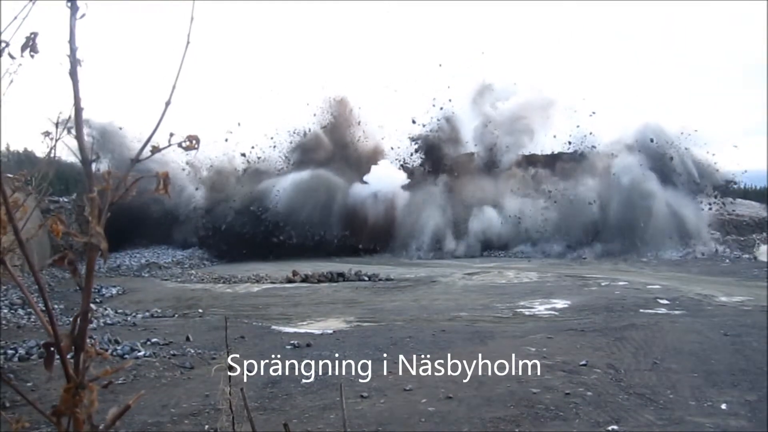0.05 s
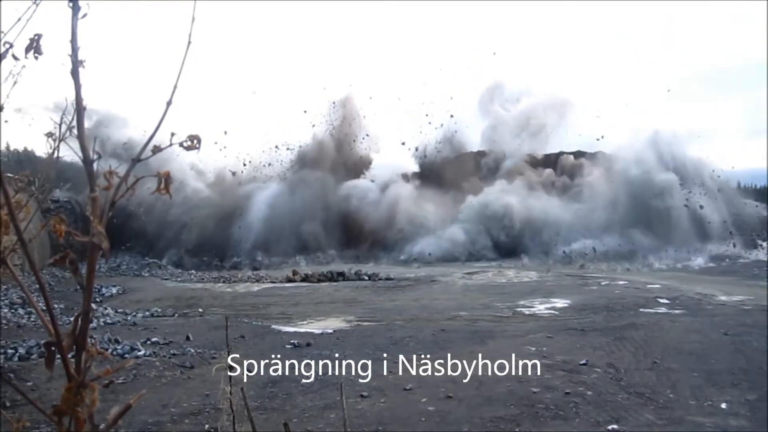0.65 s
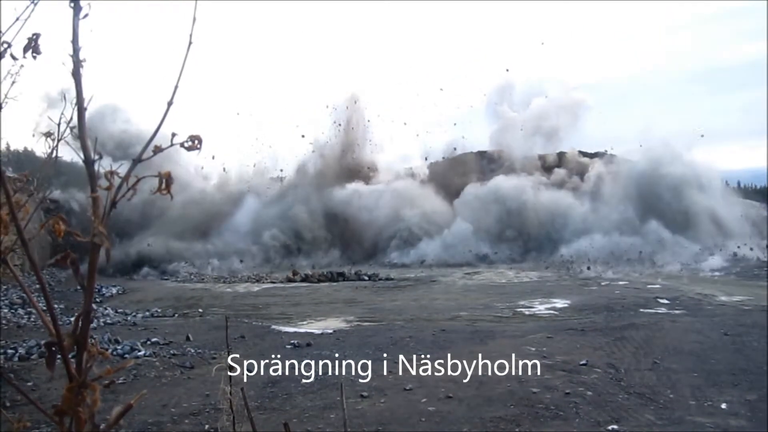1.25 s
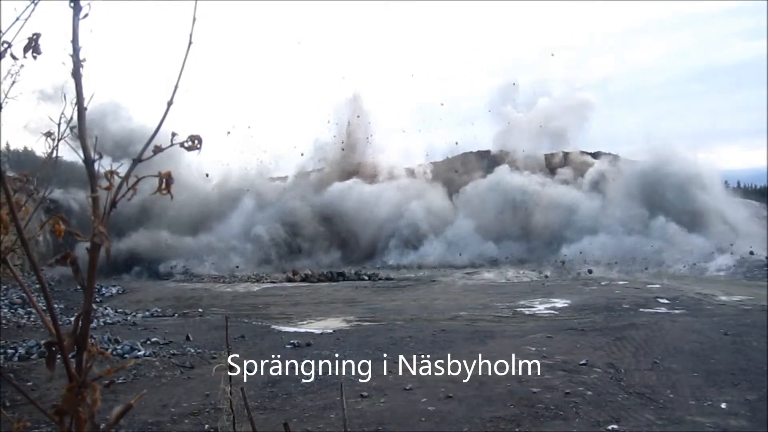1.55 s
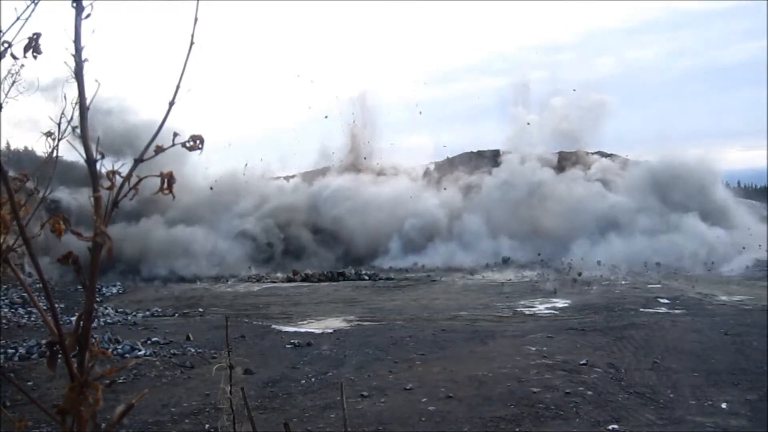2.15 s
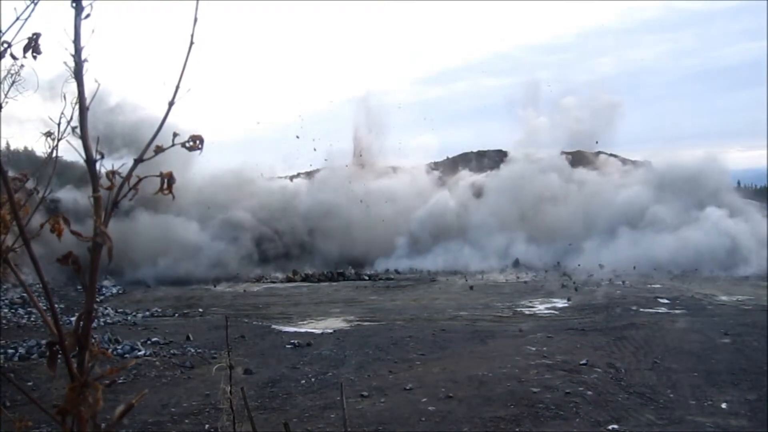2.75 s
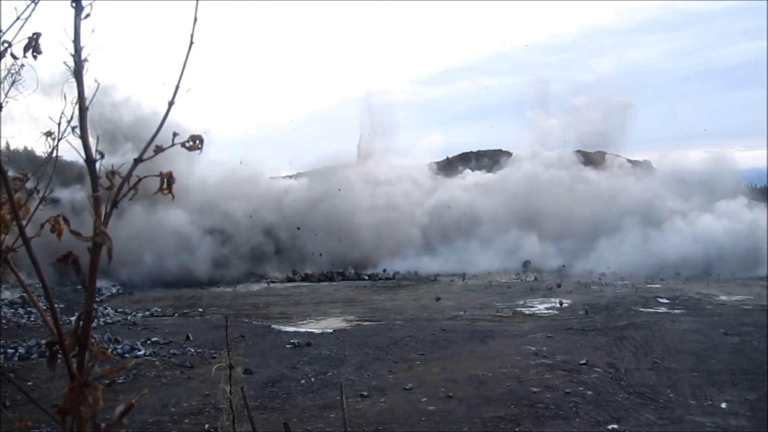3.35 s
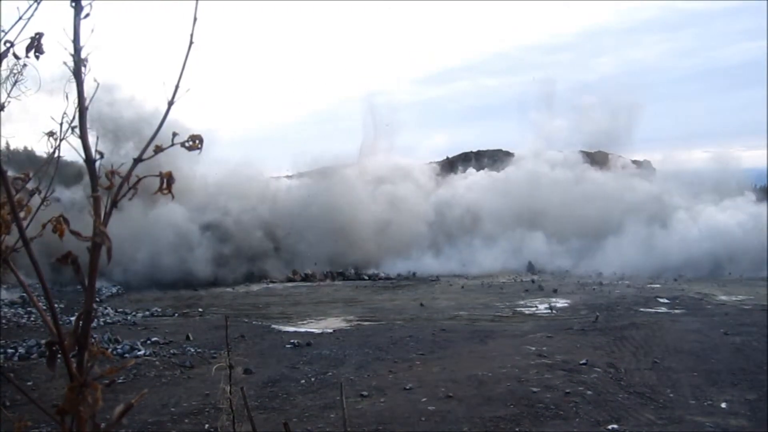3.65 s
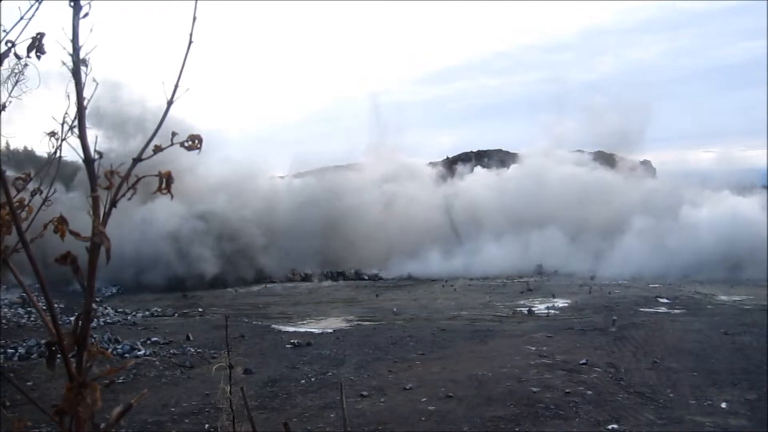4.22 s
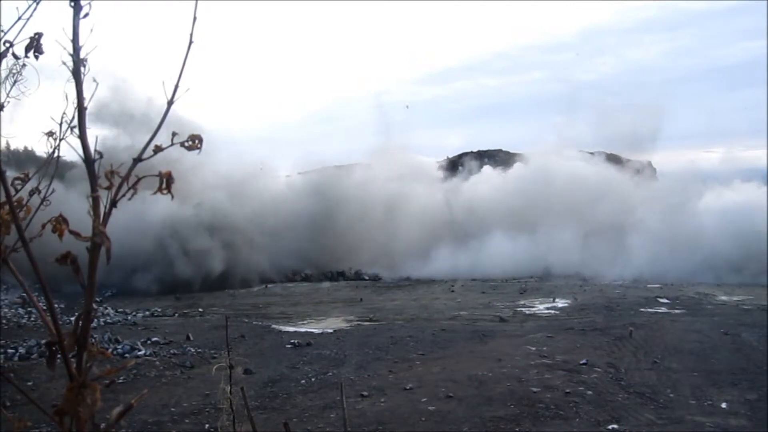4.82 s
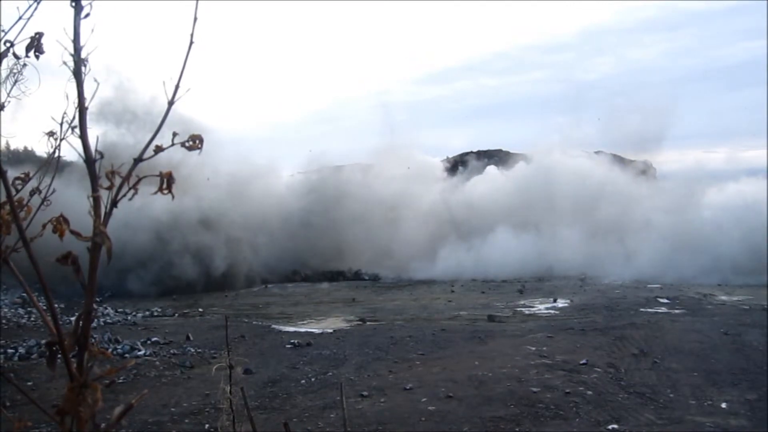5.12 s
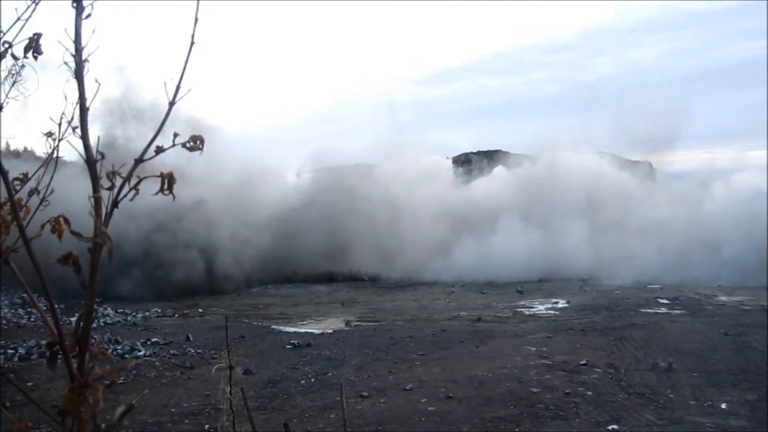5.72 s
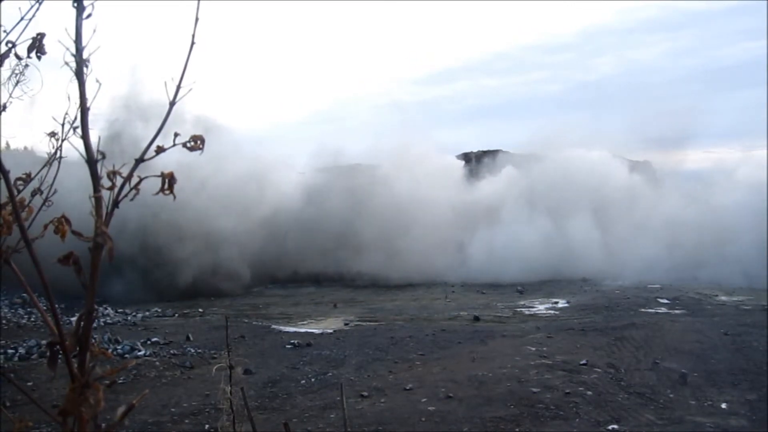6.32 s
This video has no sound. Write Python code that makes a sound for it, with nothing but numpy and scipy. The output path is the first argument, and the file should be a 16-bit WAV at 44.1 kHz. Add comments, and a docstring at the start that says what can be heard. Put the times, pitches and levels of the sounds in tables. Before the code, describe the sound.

Broken rock pours down in a distant roar over a low throb, then thins into clatter and single knocks of falling stones.

```python
"""Rock fall after a quarry blast

Some way off, the broken rock face pours down. Countless boulders, stones and bits of gravel strike
each other in a roar that swells, then thins out into a clatter and single knocks. A low throb comes
and goes underneath. A small camera's microphone picks it up, adding hollow tones and a faint hiss."""
import sys
import numpy as np
from scipy import signal
from scipy.fft import rfft, irfft, next_fast_len
from scipy.io import wavfile
from scipy.ndimage import map_coordinates

SR = 44100
rng = np.random.default_rng(int(sys.argv[2]) if len(sys.argv) > 2 else 0)


def wav_record(signal):
    """Record a signal, one row per channel, as 16-bit PCM in the file named by sys.argv[1]."""
    frames = np.transpose(np.atleast_2d(signal))
    bounded = np.clip(frames, -1, 1)
    # unit amplitude maps onto the largest positive 16-bit level
    quanta = np.round(bounded * 32767).astype(np.int16)
    wavfile.write(sys.argv[1], SR, quanta)


N = 285327
TIME = np.arange(N) / SR
SIZE = next_fast_len(N + SR // 2, True)
FREQ = np.fft.rfftfreq(SIZE, 1 / SR)

# How the falling stones grow loud and fade:
# peak_db, swell_db, swell_end_s, hold_end_s, slump_db, thinning_db_per_s
STONE_LOUDNESS = (-18.5, 3.5, 0.55, 0.88, 2.5, 5.5)


def amp(db):
    """Turn decibels into a number to multiply a sound by."""
    return 10 ** (np.asarray(db) / 20)


def unit(x):
    """Scale a sound so that its average power is 1."""
    return x / np.sqrt(np.mean(x ** 2) + 1e-20)


def tone_curve(points):
    """Join (pitch_hz, level_db) points into a level for every frequency."""
    hz, db = np.transpose(points)
    return np.interp(np.log(FREQ + 1), np.log(hz + 1), db)


def wobble(rate):
    """A smooth random curve through `rate` new values a second."""
    return map_coordinates(rng.standard_normal(int(N * rate / SR) + 4), [TIME * rate])


def coloured(x, db):
    """Turn each frequency up or down by db, so that ringing comes after a hit, never before."""
    cepstrum = irfft(np.log(amp(db)), SIZE)
    cepstrum[1:SIZE // 2] *= 2
    cepstrum[SIZE // 2 + 1:] = 0
    return irfft(rfft(x, SIZE) * np.exp(rfft(cepstrum)), SIZE)[:N]


def housing():
    """The microphone's hollow case rings at certain pitches: the boost in dB at each frequency."""
    # Where the case rings: pitch_hz, half_width_hz, boost_db
    resonances = [(460, 56, 5.5), (626.3, 33, 9), (735, 37, 7.5), (923, 120, 12), (1425, 76, 9),
                  (1598, 62, 5), (1920, 180, 8.5), (2619.6, 104, 15), (2800, 76, 5), (3689, 76, 9.5),
                  (4086, 135, 10), (4737, 107, 11), (5250, 114, 9.5), (6670, 140, 7)]
    return sum(db * np.exp(-((FREQ - hz) / width) ** 2 / 2) for hz, width, db in resonances)


def fall_level(peak_db, swell_db, swell_end_s, hold_end_s, slump_db, thinning_db_per_s, slump_s=0.31):
    """One size of rock swells, holds, slumps as the main mass lands, then thins out: its level in dB."""
    swell_left = np.clip(1 - TIME / swell_end_s, 0, 1)
    fading_s = np.maximum(TIME - hold_end_s, 0)
    landed = 1 - np.exp(-fading_s / slump_s)
    return peak_db - swell_db * swell_left - slump_db * landed - thinning_db_per_s * fading_s


def air():
    """The open air makes a faint low wash over the quarry floor."""
    # The tone of the air: pitch_hz, level_db
    air_tone = [(15, 0.5), (27, 4), (55, -8.5), (100, -1), (250, -4.5), (500, -21), (1500, -36)]
    return amp(-58.5) * unit(coloured(rng.standard_normal(N), tone_curve(air_tone)))


def throb_strength(rise_s=0.073, fall_s=0.057, tremor_db=-48.5, fade_db_per_s=2.5):
    """Each surge of the throb rises, holds and dies away, on top of a weak, slowly fading tremor."""
    # Surges of the throb: start_s, length_s, level_db
    surges = [(0.037, 1.14, -37), (1.517, .96, -46.5), (1.84, .28, -39), (3.08, 0.28, -56),
              (3.757, 0.52, -49.5)]
    power = amp(tremor_db - fade_db_per_s * TIME) ** 2
    for start, length, db in surges:
        rise = np.clip((TIME - start) / rise_s, 0, 1)
        fall = np.exp(-np.maximum(TIME - start - length, 0) / fall_s)
        power += (amp(db) * rise * fall) ** 2
    return np.sqrt(power)


def throb(rate_hz=17.55):
    """A low shudder: soft thumps that push and pull in turn, over a slow sway."""
    cycles = np.cumsum(rate_hz * (1 + 0.0075 * wobble(4))) / SR
    phase = 2 * np.pi * cycles + 0.13 * wobble(40)
    swing = np.sign(np.sin(phase))
    kicks = np.diff(swing, prepend=swing[0]) * amp(1.5 * wobble(35))  # two kicks in each cycle
    t = TIME[:SR // 4]

    def ring(hz, fade_s):
        """Each kick starts a tone that drops 60 dB in fade_s."""
        tone = np.sin(2 * np.pi * hz * t) * amp(-60 * t / fade_s)
        return unit(signal.fftconvolve(kicks, tone)[:N])

    thump = ring(hz=50, fade_s=0.038)
    rattle = amp(-2) * ring(hz=115, fade_s=0.031)
    sway = amp(-7) * np.sin(phase) + amp(-2) * np.sin(2 * phase)
    return throb_strength() * unit(thump + rattle + sway)


def knock(pitch_hz, width_octaves, contact_s, housing_db, grit_db=-20, grit_fade_s=0.19):
    """A rock crunches for an instant and scatters grit; a narrow width gives the clink of a hard chip."""
    t = np.arange(SR // 5) / SR
    hz = np.fft.rfftfreq(len(t), 1 / SR) + 1
    band = np.exp(-(np.log2(hz / pitch_hz) / width_octaves) ** 2 / 2)
    band *= amp(np.interp(hz, FREQ, housing_db))
    crunch = irfft(rfft(rng.standard_normal(len(t))) * band, len(t))
    progress = t / contact_s
    blow = progress * np.exp(1 - progress)  # strongest at contact_s
    grit = amp(grit_db - 60 * t / grit_fade_s) * (1 - np.exp(-progress))
    shape = blow + grit
    return unit(crunch * shape) * np.sqrt(np.mean(shape ** 2))


def clatter(count, offset_db, stand_out_db, pitch_hz, range_octaves, spread_db=2.5):
    """Stray stones bounce all through the slide, standing out more and more as it thins."""
    out = np.zeros(N + SR)
    housing_db, stones_db = housing(), fall_level(*STONE_LOUDNESS)
    for when, force, smallness in rng.random((count, 3)):
        start = int(when * N)
        db = stones_db[start] + offset_db + stand_out_db * when + spread_db * (2 * force - 1)
        db -= 4 * smallness  # smaller stones are weaker, and higher too
        hz = pitch_hz * 2 ** (range_octaves * (2 * smallness - 1))
        hit = amp(db) * knock(hz, width_octaves=0.4, contact_s=0.0011, housing_db=housing_db)
        out[start:][:len(hit)] += hit
    return out[:N]


def near_rocks():
    """Single rocks land nearer by as the roar dies down, each with a short rattle of grit."""
    # Rocks landing: start_s, level_db, pitch_hz, width_octaves, contact_s
    landings = [(2.475, -27.5, 2400, 0.42, 0.0027), (3.389, -31.5, 2200, 0.41, 0.0017),
                (3.482, -28, 1290, .6, .0018), (3.71, -33.5, 3180, .4, 0.002),
                (3.764, -35.5, 4800, 0.095, 0.0015), (4.05, -34.5, 2800, .42, .003),
                (4.144, -30.5, 1290, 1.1, 0.0048), (4.162, -42.5, 5100, 0.12, 0.0026),
                (4.243, -44, 4970, 0.45, 0.0023), (4.435, -29, 2030, 0.24, 0.0029),
                (4.564, -35.5, 1490, .45, 0.0028), (4.64, -33.5, 1510, 0.67, 0.0042),
                (4.851, -42, 2600, 0.81, 0.002), (4.859, -37, 3870, 0.62, 0.0016),
                (5.016, -35, 1160, 0.25, 0.0016), (5.219, -38, 480, .55, .004),
                (5.52, -35.5, 785, 0.27, .0015), (5.647, -40, 700, 1.3, 0.0033),
                (5.753, -47, 4170, .3, 0.0018), (5.846, -30, 250, 1.47, 0.00093),
                (5.892, -37.5, 2600, .55, .0013), (5.9386, -28, 1270, 0.92, 0.0025),
                (6.022, -34.5, 1300, .9, .0014), (6.042, -32.5, 1670, 0.72, .0028),
                (6.062, -32.5, 1490, 0.83, 0.0015), (6.158, -41, 2650, .16, .0026)]
    out, housing_db = np.zeros(N + SR), housing()
    for start_s, level_db, pitch_hz, width_octaves, contact_s in landings:
        hit = amp(level_db) * knock(pitch_hz, width_octaves, contact_s, housing_db, grit_db=-12)
        out[round(start_s * SR):][:len(hit)] += hit
    return out[:N]


def impacts(per_s, spread_db):
    """Rocks touch at random moments, each making one click of random strength."""
    hits = rng.random(N) < per_s / SR
    strength = amp(spread_db * np.clip(rng.standard_normal(N), -2, 2))
    return unit(hits * strength * rng.standard_normal(N) / np.sqrt(per_s))


def pour(tone, per_s, spread_db, far_db):
    """One size of rock pours down: separate hits over the blur of countless farther ones."""
    contacts = impacts(per_s, spread_db) + amp(far_db) * rng.standard_normal(N)
    return unit(coloured(contacts, tone_curve(tone) + housing()))


def rock_fall(slip_at_s=6.13, slip_width_s=0.22, slip_peak_db=2.5):
    """The main roar: the more rock is moving, the louder and closer together the hits are."""
    # The tone of the hits for each size of rock: pitch_hz, level_db
    boulder_tone = [(20, -42), (70, -9), (150, -3.5), (260, -2.5), (480, 2), (900, -2.5), (1200, -4.5),
                    (1800, -19), (4000, -69.5)]
    stone_tone = [(300, -31.5), (800, -18.5), (1300, 1.5), (1950, 1), (2400, -2), (3100, 0), (3400, -12.5),
                  (4500, -23), (8000, -51)]
    gravel_tone = [(1500, -32), (3000, -6), (3700, 2.5), (4500, -3), (5100, -5), (6200, -11.5),
                   (7200, -17.5), (8600, -22.5), (9800, -36.5), (15000, -49)]
    # How boulders and gravel grow loud and fade:
    # peak_db, swell_db, swell_end_s, hold_end_s, slump_db, thinning_db_per_s
    boulder_loudness = (-20, 1.5, 0.33, 0.69, 3.5, 5)
    gravel_loudness = (-32, 4.5, 0.5, 1.3, 2.1, 5.5)
    boulders_db = fall_level(*boulder_loudness)
    stones_db = fall_level(*STONE_LOUDNESS)
    gravel_db = fall_level(*gravel_loudness)
    flow = amp(0.7 * (stones_db - stones_db.max()))  # 1 when the most rock is moving
    # Hits come in clumps: one tumbling block throws big and small pieces together.
    clumps_db = 0.46 * wobble(18) + 0.15 * wobble(130)
    # A last patch of the heap gives way.
    slip_db = slip_peak_db * np.exp(-((TIME - slip_at_s) / slip_width_s) ** 2 / 2)
    boulders = amp(boulders_db) * pour(boulder_tone, per_s=1800 * flow, spread_db=2.5, far_db=2.5)
    stones = amp(stones_db) * pour(stone_tone, per_s=4000 * flow, spread_db=1.5, far_db=2.5)
    gravel = amp(gravel_db) * pour(gravel_tone, per_s=4000 * flow, spread_db=4.5, far_db=3)
    return amp(clumps_db + slip_db) * (boulders + stones + gravel)


def scene():
    """Everything heard at the edge of the quarry floor, in one channel."""
    stones = clatter(count=150, offset_db=-7, stand_out_db=6, pitch_hz=1610, range_octaves=1.23)
    pebbles = clatter(count=40, offset_db=-15.5, stand_out_db=11, pitch_hz=4400, range_octaves=0.25)
    return (rock_fall() + stones + pebbles + near_rocks() + throb() + air())[None]


def record(dry):
    """The camera adds a faint hiss and cuts off the very highest pitches."""
    # The tone of the hiss: pitch_hz, level_db
    hiss_tone = [(20, 1), (300, 6.5), (3000, -0.5), (8000, 0.5), (11000, -3.5), (11400, -1.5), (11700, -3),
                 (12000, -3), (13500, -8), (15600, -7)]
    top_hz = 15750
    hiss = amp(-58.5) * unit(coloured(rng.standard_normal(N), tone_curve(hiss_tone)))
    return irfft(rfft(dry + hiss, SIZE) * (FREQ < top_hz), SIZE)[..., :N]


dry = scene()
out = record(dry)
wav_record(out)
```